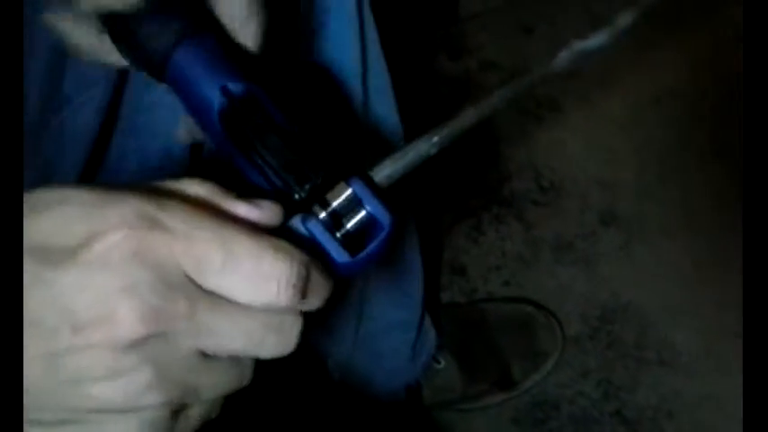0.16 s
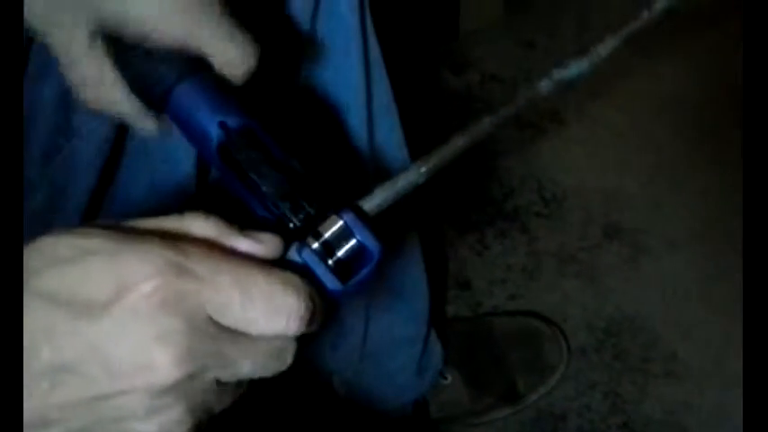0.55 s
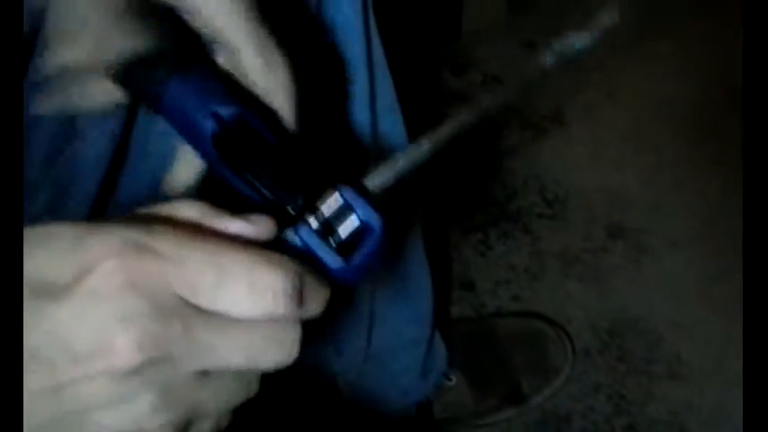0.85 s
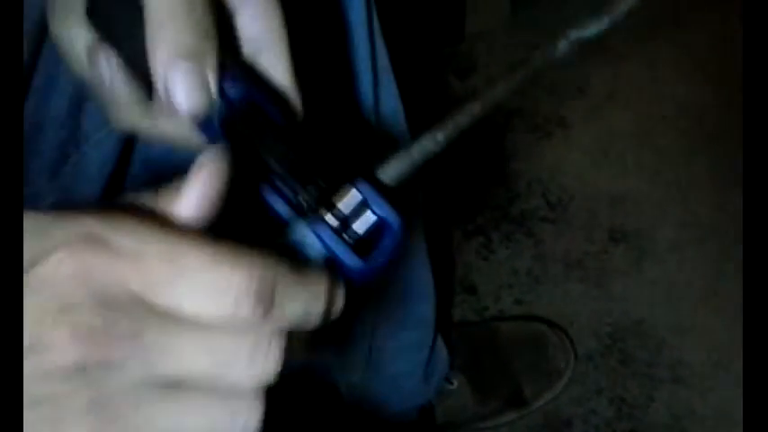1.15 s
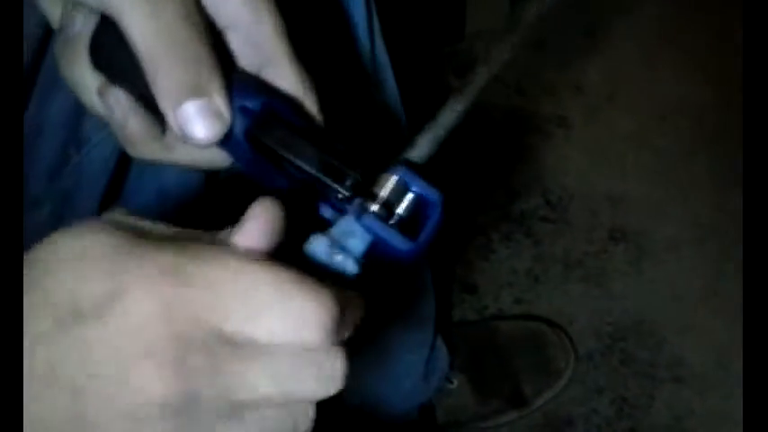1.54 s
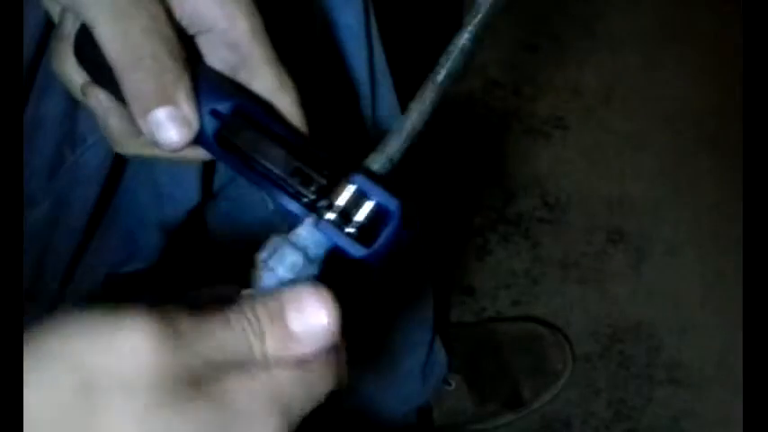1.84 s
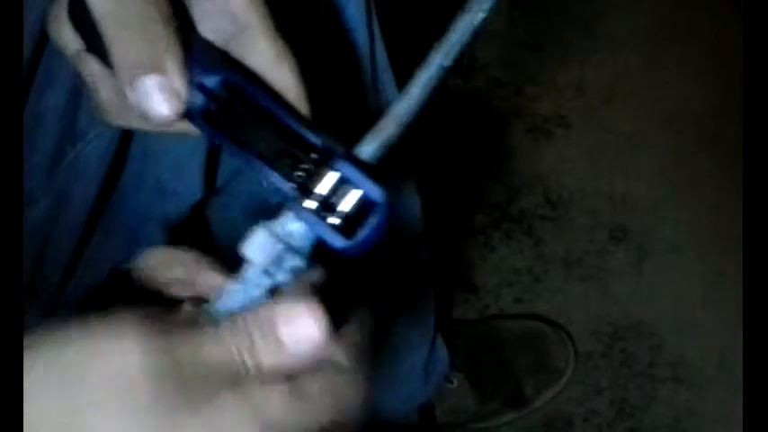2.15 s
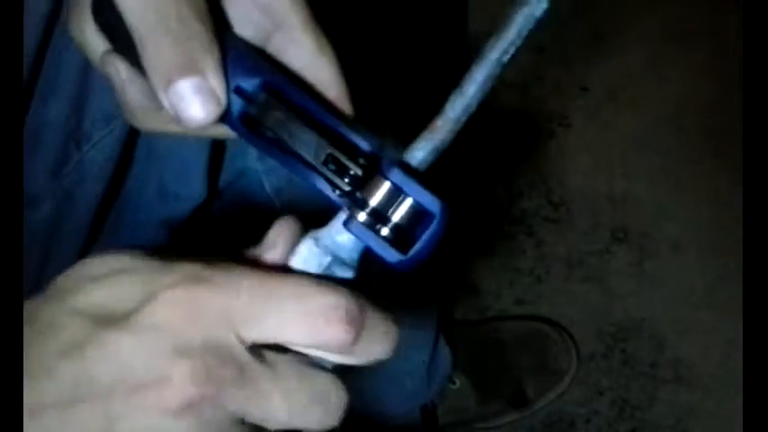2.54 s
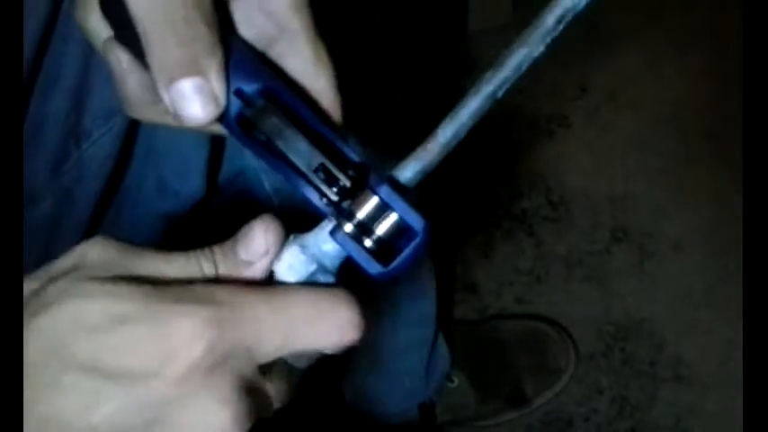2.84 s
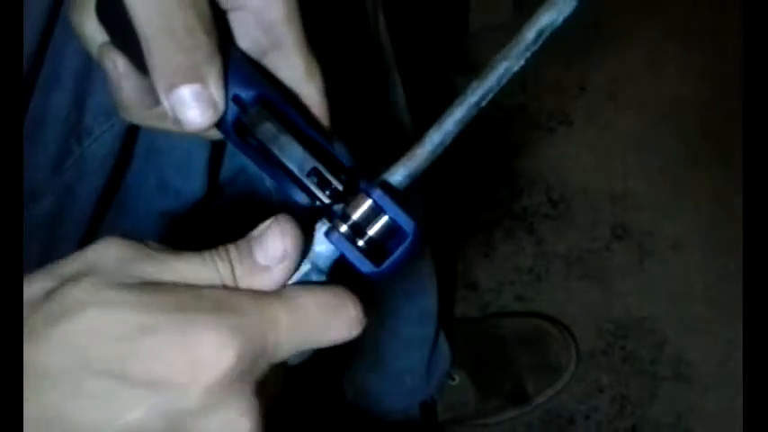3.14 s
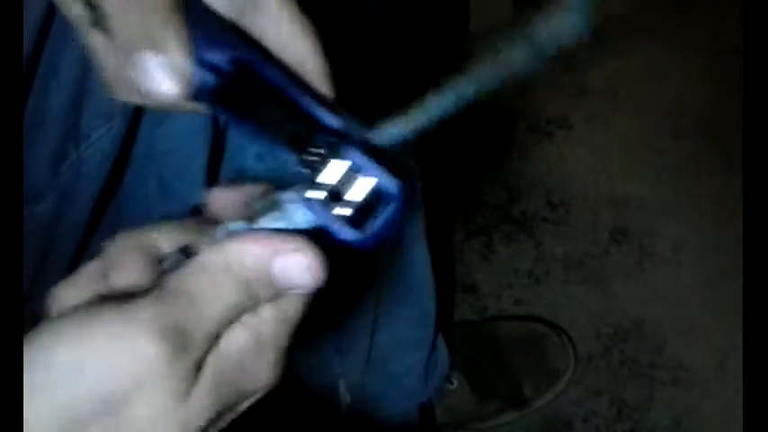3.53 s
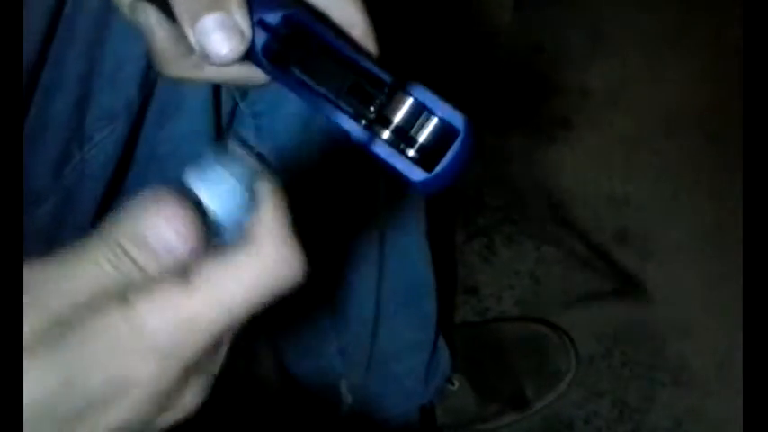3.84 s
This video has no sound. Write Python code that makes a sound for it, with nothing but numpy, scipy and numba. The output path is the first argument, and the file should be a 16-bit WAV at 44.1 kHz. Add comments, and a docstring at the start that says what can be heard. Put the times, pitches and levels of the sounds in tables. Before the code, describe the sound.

A sharp metallic clatter comes near the end, heard close in a quietly humming workshop. Before it, fingers rub and a pipe cutter scrapes faintly on a thin tube, with small ticks around 1 second and two soft rag wipes just after 2. At 3.4 seconds steel strikes steel in a loud, quick, ringing cluster. A dull thump with a clink follows at 3.8, then a small knock.

```python
"""A pipe cutter on a thin metal tube, close to a small microphone in a quiet workshop.
First cloth and fingers rub, the turning tube scrapes and the tool ticks; after 2 s a rag wipes the tube.
At 3.4 s the jaws snap through: steel strikes steel, cutter and tube ring, the recorder ducks and clips.
A dull thump follows at 3.83 s, a small knock at 3.96 s."""
import sys
import numpy as np
from scipy import signal
from scipy.fft import rfft, irfft
from scipy.io import wavfile
from scipy.ndimage import uniform_filter1d
from numba import njit

SR = 44100
rng = np.random.default_rng(int(sys.argv[2]) if len(sys.argv) > 2 else 0)


def generate_wav(signal):
    """Clip the signal to [-1, 1] and save it as 16-bit WAV at the path in sys.argv[1]."""
    frames = np.transpose(np.atleast_2d(signal))
    scaled = np.clip(frames, -1, 1) * 32767
    pcm = np.round(scaled).astype(np.int16)
    wavfile.write(sys.argv[1], SR, pcm)


N = 176400

# spectrum of a steel crack: f/Hz, level/dB
CRACK_COLOUR = [(200, -29.5), (700, -30), (1200, -28), (2400, -12.5), (4000, -6.5), (4800, -9),
                (6500, -11.5), (8000, 2), (9500, -4.5), (11000, -12.5), (15500, -19)]


def clatter():
    """Each strike cracks, clacks a small part and sets the cutter and the tube ringing."""
    # steel on steel: t/s, crack/dB, clack f/Hz, clack/dB, t60 of both/s, ring/dB,
    # place (0 edge, 1 face), tube/dB
    strikes = [(3.4293, -21.5, 10500, -12.5, 0.012, -23, .1, -48),
               (3.445, -5, 5400, -6, 0.049, -28, .1, 0.5), (3.4489, -35, 10400, -2, 0.025, -31, .1, -23),
               (3.4588, -3.5, 9580, 6, 0.024, -5, 0.11, -14), (3.4649, -11, 9430, -5, 0.022, -17, .05, -1),
               (3.469, -10.5, 8250, -26, 0.24, -6, .05, -19), (3.4916, -30, 8100, -27, .035, 2, 0.86, -21),
               (3.509, -24, 8500, -16, .03, 3, 1, -16), (3.52, -17, 3920, -7.5, 0.12, 4, 0.59, 8),
               (3.532, -7, 7720, 0, 0.055, -6, .6, 7.5), (3.544, -24, 7730, -3, 0.019, -26, .3, -24),
               (3.5926, -3, 9900, 4, 0.017, -42, .3, -13), (3.5945, -23, 4155, -5, 0.028, -36, .3, -28),
               (3.6, -3, 8820, -3, 0.044, -12, 0.18, -9),
               (3.8331, -14.5, 8070, -11.5, 0.046, -26, 0.83, -29),
               (3.841, -37, 7840, -30, 0.032, -24, 1, -46)]
    # cutter modes: f/Hz
    cutter_hz = [3370, 4078, 5278, 6408, 6643, 7541, 8057, 9106, 9325, 9884, 10347, 10787, 13091, 14534]
    # per cutter mode: edge hit/dB, face hit/dB, t60/s
    cutter_modes = [(-17.5, -25.5, 0.32), (-18, -20.5, .21), (-14, -26, 0.25), (-50, -14, 0.33),
                    (-13, -20.5, 0.38), (-9, -21, 0.25), (-3.5, -11, 0.33), (-6, -1.5, .13),
                    (-40, -9.5, 0.18), (-43, -15, 0.17), (-30, -17, .13), (-32, -12, 0.11),
                    (-32, -23, 0.16), (-46, -32, .17)]
    # modes of the freed tube: f/Hz
    tube_hz = [2336, 2715, 3661, 3860, 5464, 7870, 10573, 12306, 13888, 15213]
    # per tube mode: level/dB, t60/s
    tube_modes = [(-43, 1.1), (-43, .45), (-32, .6), (-26, .55), (-33, .65), (-32, .4), (-22, .12),
                  (-29, .17), (-29, .12), (-29, .15)]
    times_s, *_, ring_db, place, tube_db = np.array(strikes).T
    crack_noise = noise(CRACK_COLOUR)
    out = np.zeros(N)
    for at_s, crack_db, clack_hz, clack_db, t60_s, *_ in strikes:
        out += amp(crack_db) * crack_noise * fade(at_s, t60_s)
        out += amp(clack_db) * burst(at_s, clack_hz, t60_s, jitter=0.043)
    for hz, (edge_db, face_db, t60_s) in zip(cutter_hz, cutter_modes):
        out += ring(hz, t60_s, times_s, ring_db + edge_db * (1 - place) + face_db * place)
    for hz, (db, t60_s) in zip(tube_hz, tube_modes):
        out += ring(hz, t60_s, times_s, tube_db + db)
    return out + jangle(times_s, ring_db - 26)


def ring(hz, t60_s, times_s, levels_db):
    """A struck mode beats with its weaker twin; the level wavers as the part moves."""
    cycles = hz * since(0) + rng.random()
    split_hz = rng.uniform(5.5, 16.5)
    beat_cycles = split_hz * since(times_s.min())
    pair = np.sin(2 * np.pi * cycles) + 0.4 * np.cos(2 * np.pi * (cycles + beat_cycles))
    return ring_envelope(times_s, levels_db, t60_s) * waver(db=1.6, hz=45) * pair


def jangle(times_s, levels_db):
    """Weak modes of the small steel parts, scattered over the treble."""
    modes_hz = rng.uniform(2200, 15800, size=48)
    scatter_db = 0.5 * rng.standard_normal(48)
    gains = amp(np.interp(modes_hz, *np.array(CRACK_COLOUR).T) - scatter_db)
    tones = gains @ np.sin(2 * np.pi * np.outer(modes_hz, since(0)))
    return tones * ring_envelope(times_s, levels_db, t60_s=0.17)


def ring_envelope(times_s, levels_db, t60_s):
    """Strikes add energy that drains away; a brushing contact damps what rings by then."""
    brush_at_s, brush_s, brush_db = 3.545, 0.02, -6.5
    energy = np.zeros(N)
    np.add.at(energy, (times_s * SR).astype(int), amp(levels_db) ** 2)
    age_s = since(brush_at_s)
    retained = np.exp(-2 * np.log(1000) / (t60_s * SR))
    early, late = signal.lfilter([1], [1, -retained], [energy * (age_s == 0), energy * (age_s > 0)])
    damping = amp(brush_db * np.minimum(age_s / brush_s, 1))
    return np.sqrt(early * damping ** 2 + late)


def thumps():
    """Each blow gives a hollow tap and a dull knock, then low modes swell and die."""
    # blows: t/s, boom/dB, knock/dB, tap/dB
    blows = [(0.974, -38, -49, -70), (1.441, -48, -43, -70), (3.8325, -2, -16.5, -12.5),
             (3.901, -36, -52, -62), (3.9588, -31, -24.5, -14)]
    # boom modes: f/Hz, level/dB, t60/s, rise/s
    boom_modes = [(63.6, -8.5, 0.16, 0.0072), (85, -3.5, 0.11, .005), (130, -3, 0.081, 0.0085),
                  (179.7, 1, 0.069, 0.0027), (247, -4, 0.053, 0.0029)]
    # knock spectrum: f/Hz, level/dB
    knock_colour = [(60, 4), (150, 9), (300, 5), (600, -2), (950, -3), (1200, -29), (1500, -40),
                    (2200, -48), (5000, -60)]
    tap_hz, contact_rise_s = 720, 0.00054
    knock_noise = noise(knock_colour)
    out = np.zeros(N)
    for at_s, boom_db, knock_db, tap_db in blows:
        age_s = since(at_s)
        for k, (hz, db, t60_s, rise_s) in enumerate(boom_modes):
            envelope = (1 - np.exp(-(age_s / rise_s) ** 2)) * fade(at_s, t60_s)
            out += (-1) ** k * amp(boom_db + db) * envelope * np.sin(2 * np.pi * hz * age_s)
        knock = amp(knock_db) * knock_noise * fade(at_s, t60_s=0.088)
        tap = 2 * amp(tap_db) * np.sin(2 * np.pi * tap_hz * age_s) * fade(at_s, t60_s=0.0069)
        out += (knock + tap) * (1 - np.exp(-age_s / contact_rise_s))
    return out


def rubbing():
    """Cloth and skin rub with a fine grain, louder with hand pressure."""
    # hand pressure as rub level: t/s, level/dB
    pressure = [(0, -60.5), (.09, -57), (.14, -48), (.24, -57), (.5, -60.5), (.6, -55.5), (.71, -60),
                (.75, -55), (.85, -64), (.89, -47), (.94, -55), (1.02, -55), (1.06, -51), (1.3, -57),
                (1.53, -62.5), (1.76, -61.5), (1.84, -51.5), (1.89, -56.5), (2.09, -42), (2.16, -53.5),
                (2.21, -44.5), (2.29, -45), (2.4, -54.5), (2.63, -64), (2.73, -55.5), (3.04, -62),
                (3.07, -50), (3.13, -55.5), (3.3, -61.5), (3.41, -48.5), (3.6, -34), (4.0, -51.5)]
    # rub spectrum: f/Hz, level/dB
    colour = [(1000, -20), (2500, -9), (3800, -22), (4900, -23), (6200, -18.5), (7300, -7), (8100, -1),
              (9200, -9.5), (10800, -9), (12500, -17.5), (15800, -30)]
    return noise(colour) * amp(curve(pressure) + 0.5) * waver(db=2, hz=500)


def wiping():
    """A rag rubs along the tube in two soft strokes."""
    # strokes: t/s, half length/s, level/dB
    strokes = [(2.1, 0.019, -42), (2.28, 0.038, -46.5)]
    # rag friction spectrum: f/Hz, level/dB
    colour = [(500, -34), (800, 0), (950, 9), (1250, -7.5), (1700, 8.5), (2050, -18), (2800, -10),
              (4500, -28)]
    envelope = sum(amp(db) * np.exp(-((since(0) - at_s) / half_s) ** 2 / 2)
                   for at_s, half_s, db in strokes)
    return noise(colour) * envelope * waver(db=2.5, hz=120)


def ticking():
    """Small, damped ticks of the tool."""
    # ticks: t/s, f/Hz, level/dB, t60/s
    ticks = [(.888, 9200, -40, 0.022), (1.006, 2130, -33, 0.026), (1.029, 3450, -41.5, .05),
             (1.0355, 3510, -33, 0.02), (1.0355, 8100, -30, .008), (1.835, 7700, -43, .02),
             (3.073, 9600, -36, .015)]
    return sum(amp(db) * burst(at_s, hz, t60_s, jitter=0.023) for at_s, hz, db, t60_s in ticks)


def scraping():
    """The tube turns in the jaws with a faint, uneven scrape."""
    # scrape envelope: t/s, level/dB
    levels = [(0, -61), (.25, -58.5), (.36, -53), (.55, -56), (.8, -57.5), (.95, -60.5), (1.06, -53.5),
              (1.3, -60), (1.6, -58.5), (1.9, -56.5), (2.07, -59), (2.18, -53.5), (2.27, -64), (2.5, -64),
              (3.0, -59), (3.4, -65)]
    # scrape spectrum: f/Hz, level/dB
    colour = [(700, -32), (1250, 6), (1550, 5.5), (1850, 0.5), (2250, 1.5), (2600, -34.5), (2900, 7),
              (3200, -14.5), (3800, -2), (4800, -22.5), (9000, -28)]
    return noise(colour) * amp(curve(levels) - 2.5) * waver(db=4.64, hz=85)


def bumping():
    """The hands shift with soft bumps."""
    # bump spectrum: f/Hz, level/dB
    colour = [(90, -23), (160, -1.5), (310, -9), (420, -2), (800, -15), (1500, -29)]
    return amp(-64.5) * noise(colour) * waver(db=3.5, hz=27)


def room(x):
    """Diffuse tail of the workshop."""
    tail = (rng.standard_normal(N) * fade(at_s=0.0054, t60_s=0.33))[:SR]
    return amp(-18) * signal.fftconvolve(x, tail / np.linalg.norm(tail))[:N]


def background():
    """Steady workshop noise with narrow, droning resonances."""
    # noise spectrum: f/Hz, density/dB
    colour = [(25, -38), (38, -26), (55, -7), (74, 6.5), (92, -15.5), (120, 0), (150, -0.5), (230, -6.5),
              (320, -0.5), (480, -10), (700, -7), (980, -7.5), (1200, -14), (1900, -16.5), (2500, -15.5),
              (3300, -24.5), (3900, -28), (5000, -34), (8000, -31), (15800, -33)]
    # resonances: f/Hz, width/Hz, level/dB
    hums = [(74.8, 11, -59.5), (117.2, 15, -58), (305, 42, -58), (377.4, 21, -64.5), (692, 28, -65.5),
            (950, 66, -58.5), (2367, 240, -63)]
    drone = np.zeros(N)
    for hz, width_hz, db in hums:
        phase = 2 * np.pi * hz * since(0)
        drone += amp(db) * (walk(width_hz / 2) * np.sin(phase) + walk(width_hz / 2) * np.cos(phase))
    return drone + amp(-47.5) * noise(colour) * waver(db=0.82, hz=30)


def amp(db):
    """Decibels to gain."""
    return 10 ** (np.asarray(db) / 20)


def since(at_s):
    """Seconds since a moment, zero before it."""
    return np.maximum(np.arange(N) / SR - at_s, 0)


def fade(at_s, t60_s):
    """Sudden start, exponential decay."""
    age_s = since(at_s)
    return (age_s > 0) * np.exp(-np.minimum(np.log(1000) * age_s / t60_s, 60))


def curve(points):
    """Straight lines through (t/s, value) points."""
    return np.interp(since(0), *np.array(points).T)


def noise(colour):
    """Unit noise with a spectrum of (f/Hz, level/dB) points."""
    hz, db = np.array(colour).T
    bins_hz = np.maximum(np.fft.rfftfreq(N, 1 / SR), 1)
    gains = amp(np.interp(np.log(bins_hz), np.log(hz), db))
    y = irfft(rfft(rng.standard_normal(N)) * gains, N)
    return y / y.std()


def walk(hz):
    """Unit noise, low-passed at hz."""
    rolloff = 1 + (np.fft.rfftfreq(N, 1 / SR) / hz) ** 4
    y = irfft(rfft(rng.standard_normal(N)) / rolloff, N)
    return y / y.std()


def waver(db, hz):
    """Random gain with spread db and bandwidth hz."""
    return amp(db * walk(hz))


def burst(at_s, hz, t60_s, jitter):
    """Damped resonance; jitter is the relative spread of its pitch."""
    size = SR // 8
    age_s = np.arange(size) / SR
    unsteady = uniform_filter1d(rng.standard_normal(size), size=16)
    phase = 2 * np.pi * np.cumsum(hz * (1 + jitter * unsteady / unsteady.std())) / SR
    tone = np.sin(phase) * np.exp(-np.log(1000) * age_s / t60_s)
    return np.pad(tone, (int(at_s * SR), N))[:N]


@njit
def follow(x, attack_s, release_s):
    """Level follower with separate attack and release."""
    out, level = np.empty(len(x)), 0.
    for i in range(len(x)):
        lag_s = attack_s if abs(x[i]) > level else release_s
        level += (abs(x[i]) - level) / (lag_s * SR)
        out[i] = level
    return out


def scene():
    """Close sounds, their room and the background, in mono."""
    close = rubbing() + wiping() + ticking() + scraping() + bumping() + clatter() + thumps()
    return (close + room(close) + background())[None]


def record(dry):
    """The microphone sheds deep bass, gain control ducks, the amplifier clips and the top is cut."""
    low_cut_hz, top_hz = 45, 15750
    threshold_db, ratio, ceiling = -13.5, 1.87, 0.86
    sound = signal.sosfilt(signal.butter(4, low_cut_hz, "high", fs=SR, output="sos"), dry[0])
    level = follow(sound, attack_s=0.015, release_s=0.23)
    gain = np.maximum(level / amp(threshold_db), 1) ** (1 / ratio - 1)
    oversampled = signal.resample_poly(sound * gain, 2, 1)
    clipped = signal.resample_poly(np.clip(oversampled, -ceiling, ceiling), 1, 2)
    return signal.sosfilt(signal.ellip(10, .2, 80, top_hz, fs=SR, output="sos"), clipped)[None]


dry = scene()
out = record(dry)
generate_wav(out)
```